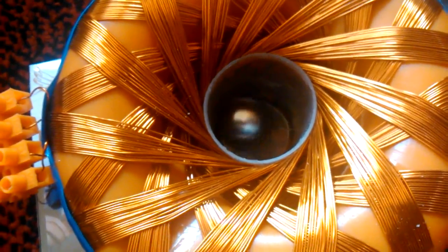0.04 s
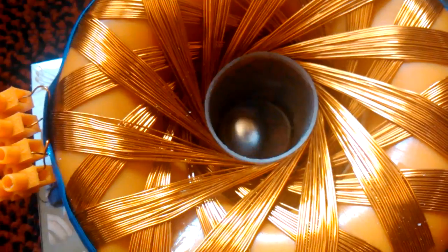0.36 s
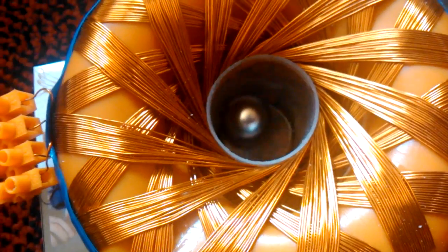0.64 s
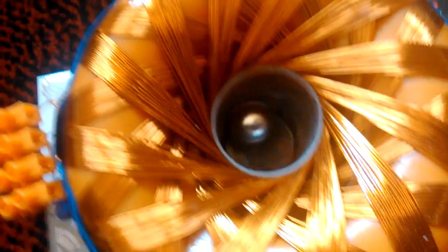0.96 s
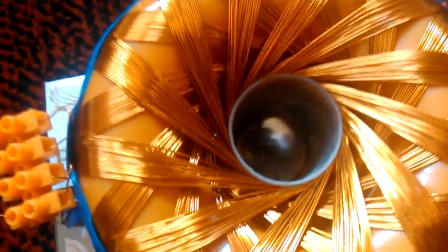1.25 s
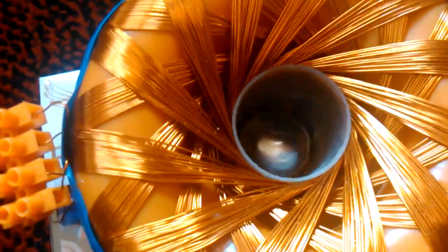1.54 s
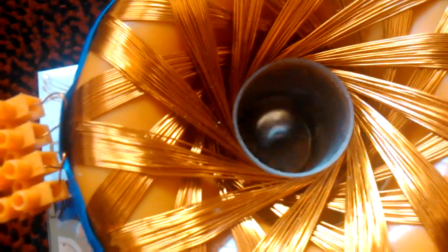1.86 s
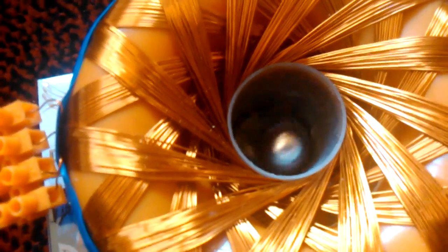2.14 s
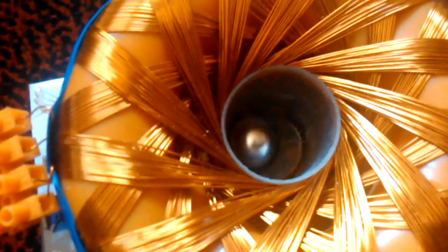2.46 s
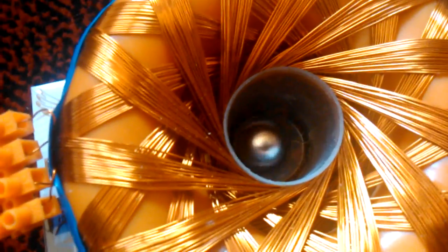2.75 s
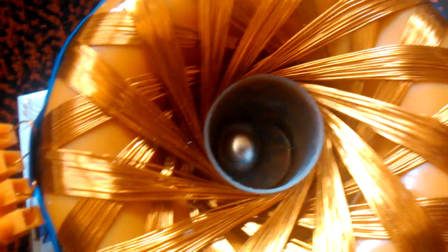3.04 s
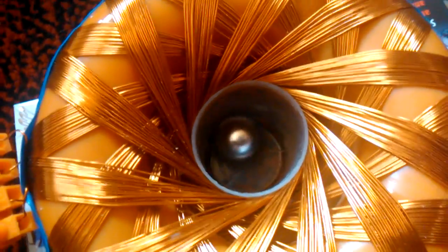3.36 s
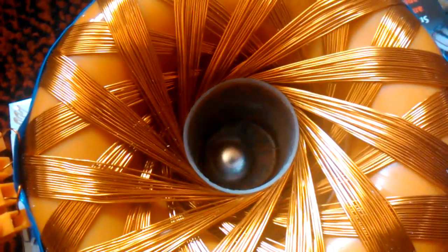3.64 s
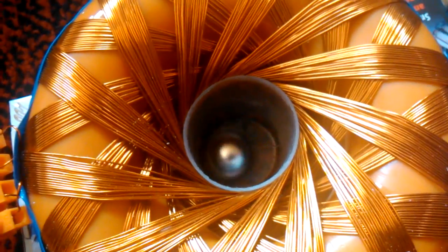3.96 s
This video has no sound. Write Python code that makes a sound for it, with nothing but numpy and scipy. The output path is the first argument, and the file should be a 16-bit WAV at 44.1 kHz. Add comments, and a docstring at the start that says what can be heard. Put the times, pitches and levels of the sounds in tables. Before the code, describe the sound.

A steel ball knocks and skids inside a tube with sharp, ringing, uneven clicks. Midway it races around with a bright scrape, then goes back to knocking. A faint electrical whine and rolling hiss lie underneath, heard up close.

```python
"""Sharp, ringing knocks and skids of a steel ball, thrown about in a tube by the field of its coils.
Each contact is a burst of tiny impacts that echoes between the tube's ends and jolts the mount.
For a second in the middle the ball races round with a bright, uneven scrape. Underneath, the
rolling ball hisses and the coils whine faintly; both dip briefly at loud contacts."""
import sys
import numpy as np
from scipy import signal
from scipy.fft import rfft, irfft
from scipy.io import wavfile
from scipy.ndimage import uniform_filter1d

SR = 44100
rng = np.random.default_rng(int(sys.argv[2]) if len(sys.argv) > 2 else 0)


def to_wav(s):
    """Save 16-bit WAV."""
    ch = np.atleast_2d(s).T  # columns
    pcm = np.round(np.clip(ch, -1, 1) * 32767)  # PCM
    wavfile.write(sys.argv[1], SR, pcm.astype(np.int16))


N = 176400
CONTACT_SAMPLES = 4096
TUBE_SPACING_HZ, SING_HZ = 603.5, 5445


def from_db(db):
    """Decibels to gain."""
    return 10 ** (np.asarray(db) / 20)


def unit_rms(x):
    """Scale to unit rms."""
    return x / np.sqrt(np.mean(x ** 2) + 1e-20)


def butter(x, hz, kind):
    """Second-order Butterworth filter."""
    return signal.sosfilt(signal.butter(2, hz, kind, fs=SR, output="sos"), x)


def colour(points, size):
    """Causal frequency response through (freq_hz, gain_db) points."""
    hz, db = np.transpose(points)
    f = np.maximum(np.arange(size // 2 + 1) * SR / size, 1)
    gain = from_db(np.interp(np.log(f), np.log(hz), db))
    cepstrum = irfft(np.log(gain))
    cepstrum[1:size // 2] *= 2
    cepstrum[size // 2 + 1:] = 0
    return np.exp(rfft(cepstrum))


def tube(echo, size, detune=0):
    """Response of sound running between the tube's ends; echo is the share left per round trip."""
    f = np.arange(size // 2 + 1) * SR / size
    return 1 / (1 - echo * np.exp(-2j * np.pi * f / (TUBE_SPACING_HZ * (1 + detune))))


# Wall spectrum: freq_hz, gain_db
WALL_SPECTRUM = [(100, 5), (600, -4.5), (850, -3), (1250, 0), (1800, 4), (2350, -0.5), (3000, -2.5),
                 (3800, -7.5), (5300, 2), (6000, -3.5), (7000, 9), (9400, 9.5), (10500, 12), (12500, 3.5),
                 (14000, 1)]
def wall(size):
    """Response of the tube wall to steel."""
    return colour(WALL_SPECTRUM, size)


def rumble():
    """Faint, steady low noise."""
    return from_db(-58.5) * unit_rms(butter(rng.standard_normal(N), (40, 110), "band"))


# Coil whine: harmonic, rms_db
COIL_HARMONICS = [(1, -59.5), (2, -42.5), (4, -49)]
def coils(pitch_hz=604):
    """The coils whine steadily on a few harmonics."""
    t = np.arange(N) / SR
    return sum(np.sqrt(2) * from_db(db) * np.sin(2 * np.pi * (harmonic * pitch_hz * t + rng.random()))
               for harmonic, db in COIL_HARMONICS)


# Hiss spectrum: freq_hz, gain_db
HISS_SPECTRUM = [(60, 15), (300, -3), (900, -18.5), (1400, 6), (1850, 6), (2700, 4), (3600, -6.5),
                 (5300, 2), (7300, 1), (9300, -0.5), (10400, 5), (12500, -5), (14000, 10.5)]
# Hiss envelope: time_s, level_db
HISS_LEVELS = [(0, -38.5), (.18, -33), (.58, -34), (.85, -30), (1.12, -34.5), (2.189, -33), (2.6, -35),
               (2.82, -31.5), (3.2, -35), (3.549, -35), (3.85, -37.5), (4, -24.5)]
def rolling(side_db=-29.5):
    """Fine roughness of the wall hisses under the ball and echoes in the tube."""
    roughness = rfft(rng.standard_normal((2, N)))
    mid, side = unit_rms(irfft(roughness * colour(HISS_SPECTRUM, N) * tube(echo=0.85, size=N)))
    hiss = mid + from_db(side_db) * np.array([side, -side])
    return hiss * from_db(np.interp(np.arange(N) / SR, *np.transpose(HISS_LEVELS)))


def glance(levels_db, full_db=11):
    """How glancing a contact is, 0-1: its ring stands out over its body."""
    body_db, ring_db = levels_db[1:3]
    return np.clip((ring_db - body_db) / full_db, 0, 1) ** 2


def rolling_on(decay_s=0.13, sing_width_hz=33):
    """After a glancing contact the ball rubs the wall until the next knock; one resonance sings."""
    t, pressure = np.arange(N) / SR, np.zeros(N)
    for start_s, _, *levels_db in list(KNOCK_CONTACTS) + list(SKID_CONTACTS):
        end_s = min([row[0] for row in KNOCK_CONTACTS if row[0] > start_s], default=np.inf)
        fade = (t > start_s) * (t < end_s) * np.exp(-np.abs(t - start_s) / decay_s)
        pressure = np.maximum(pressure, glance(levels_db) * fade)
    rub = irfft(rfft(rng.standard_normal(N)) * wall(N) * tube(echo=0.84, size=N))
    rub = unit_rms(butter(rub, (2040, 12100), "band"))
    resonance = signal.iirpeak(SING_HZ, SING_HZ / sing_width_hz, fs=SR)
    sing = unit_rms(signal.lfilter(*resonance, rng.standard_normal(N)))
    return pressure * (from_db(-37) * rub + from_db(-39) * sing)


def racing(start_s=1.17, end_s=2.23, lap_s=0.17, lap_peak_s=1.585):
    """The circling ball scrapes; an echo sweeps with its place and a very faint ring swells each lap."""
    t = np.arange(N) / SR
    lap = np.cos(2 * np.pi * (t - lap_peak_s) / lap_s)
    delay_s = 0.00076 * (1 - 0.114 * lap)
    scrape = irfft(rfft(rng.standard_normal(N)) * wall(N))
    scrape = sum(0.78 ** k * np.interp(t - k * delay_s, t, scrape) for k in range(4))
    scrape = unit_rms(butter(scrape, 4900, "high"))
    ring = unit_rms(butter(rng.standard_normal(N), (10700, 11000), "band"))
    flutter = unit_rms(uniform_filter1d(uniform_filter1d(rng.standard_normal(N), size=300), size=200))
    progress = np.clip((t - start_s) / (end_s - start_s), 0, 1)
    swell = np.abs(np.sin(np.pi * progress))
    return scrape * swell ** 0.25 * from_db(-38.5 + 5.5 * flutter) + ring * swell * from_db(-98 + 16 * lap)


# Contact bands (thud, body, ring, clack, tick): low_hz, high_hz
BANDS = [(56, 200.5), (150, 850), (1710, 1910), (2250, 5760), (8200, 22000)]
RING = 2
def band_responses(ring_hz, sing_gain=0, sing_width_hz=150):
    """The wall's sound in five bands; the singing resonance can sound along with the ring."""
    f = np.arange(CONTACT_SAMPLES // 2 + 1) * SR / CONTACT_SAMPLES
    edges_hz = [ring_hz if k == RING else band for k, band in enumerate(BANDS)]
    filters = [signal.butter(2, hz, "band", fs=SR, output="sos") for hz in edges_hz]
    responses = np.array([signal.sosfreqz(sos, f, fs=SR)[1] for sos in filters])
    resonance = signal.iirpeak(SING_HZ, SING_HZ / sing_width_hz, fs=SR)
    responses[RING] += sing_gain * signal.freqz(*resonance, f, fs=SR)[1]
    return responses * wall(CONTACT_SAMPLES)


def glide(ring, sharp_share, settle_s=0.00302):
    """The ring starts sharp and settles; the singing resonance above it holds its pitch."""
    t = np.arange(CONTACT_SAMPLES) / SR
    split_hz = np.sqrt(BANDS[RING][1] * SING_HZ)
    warped_s = t + sharp_share * settle_s * (1 - np.exp(-t / settle_s))
    return butter(ring, split_hz, "high") + np.interp(warped_s, t, butter(ring, split_hz, "low"))


ATTACK_S, RELEASE_S, CRACK_AT_S = 0.0007, 0.0016, 0.001215
DAMP_AFTER_S, DAMP_S, RING_DAMP_S = 0.0036, 0.0095, 0.0041
def contacts(rows, responses, echo=0.47, sag_db=2.5, grain_db=3, crack=0):
    """Bursts of tiny uneven impacts echo in the tube, each band at its own level; the thud rings on."""
    size = CONTACT_SAMPLES
    out, t = np.zeros(N + size), np.arange(size) / SR
    for start_s, length_s, *levels_db in rows:
        length_s = max(length_s, 0.002)
        after_s = np.maximum(t - length_s, 0)
        sag = from_db(-sag_db * np.minimum(t / length_s, 1))
        envelope = np.minimum(t / ATTACK_S, 1) * sag * np.exp(-after_s / RELEASE_S)
        signs = rng.choice([-1, 1], size)
        impacts = unit_rms(signs * from_db(grain_db * np.minimum(rng.exponential(1, size), 5)))
        impacts[int(CRACK_AT_S * SR)] += crack
        detune = 0.004 * rng.standard_normal()  # resonances shift with the ball's place
        bands = irfft(rfft(impacts * envelope) * responses * tube(echo, size, detune))
        bands[RING] = glide(bands[RING], sharp_share=0.431 * glance(levels_db))
        bands[1:] *= np.exp(-np.maximum(after_s - DAMP_AFTER_S, 0) / DAMP_S)
        bands[RING] *= np.exp(-after_s / RING_DAMP_S)
        bands *= np.sqrt(length_s * SR / np.sum(bands ** 2, axis=1, keepdims=True))
        onset = int(start_s * SR)
        out[onset:onset + size] += from_db(levels_db) @ bands
    return out[:N]


# Grazes: start_s, length_s, tick_db
GRAZE_CONTACTS = [(0.22, 0.0029, -28.5), (1.922, .004, -21), (1.275, 0.0076, -25), (1.475, 0.034, -27.5),
                  (1.674, 0.036, -27.5), (1.846, 0.025, -24), (2.001, 0.0038, -24), (2.048, 0.021, -25.5)]
def grazes(low_offset_db=-20.5, clack_offset_db=-7.5):
    """The ball brushes the wall: light and bright, mostly tick."""
    offsets_db = np.array([low_offset_db] * 3 + [clack_offset_db, 0])
    rows = [(start_s, length_s, *(tick_db + offsets_db)) for start_s, length_s, tick_db in GRAZE_CONTACTS]
    return contacts(rows, band_responses(BANDS[RING]))


# Skids: start_s, length_s, thud_db, body_db, ring_db, clack_db, tick_db
SKID_CONTACTS = [(0.1225, 0.0044, -31, -32, -33.5, -28, -22), (0.352, 0.0097, -26.5, -25, -22, -20.5, -21),
                 (0.368, 0.0099, -43, -35, -40, -29, -25.5), (0.547, 0.0095, -34, -31, -28, -25, -23),
                 (0.675, 0.03, -33, -29, -22.5, -23.5, -24.5),
                 (0.796, 0.0039, -22.5, -29.5, -28, -21.5, -19), (0.955, 0.029, -45, -35, -29, -27.5, -26),
                 (0.993, 0.0026, -19.5, -24.5, -27, -21.5, -19.5),
                 (1.172, 0.0094, -35, -32, -24, -23.5, -25.5), (1.188, 0.0091, -52, -48, -47, -26.5, -25),
                 (1.2, 0.0088, -26, -30.5, -41, -27, -27), (1.216, 0.0065, -30.5, -30.5, -39, -25.5, -22),
                 (1.289, 0.013, -60, -29.5, -53, -27.5, -23), (1.313, 0.012, -30, -21.5, -24, -19, -17),
                 (1.33, 0.01, -30, -26, -18, -20.5, -20), (1.391, 0.0088, -25, -29, -29, -23.5, -23),
                 (1.401, 0.026, -29, -22, -27, -21, -17), (1.43, 0.0027, -30, -36, -33, -23, -19),
                 (1.503, 0.02, -28.5, -24, -22.5, -20, -18.5), (1.576, 0.023, -27, -21.5, -26.5, -20, -16),
                 (1.599, 0.026, -33, -25, -43, -21.5, -19.5), (1.699, 0.025, -30, -23, -23, -20, -18),
                 (1.791, 0.013, -50, -21, -32, -20, -17), (1.811, 0.0083, -46, -36, -42, -28, -22),
                 (1.857, 0.0038, -28, -30, -20, -21.5, -41), (1.87, 0.024, -53, -29.5, -21, -24, -21),
                 (1.91, 0.006, -26.5, -29, -47, -24, -18),
                 (1.941, 0.028, -31.5, -26.5, -17.5, -22.5, -21.5),
                 (2.09, 0.018, -36, -29.5, -21.5, -21, -22.5), (2.12, 0.016, -27, -33, -48, -27, -25),
                 (2.139, 0.0045, -26, -19.5, -31, -22, -19.5), (2.151, 0.012, -34, -27, -38, -25, -22.5),
                 (2.198, 0.0024, -21.5, -19.5, -22, -16, -15), (2.539, 0.0047, -25, -22, -38, -23.5, -21.5),
                 (2.697, 0.0059, -35, -32.5, -50, -29.5, -23.5),
                 (2.777, 0.01, -42.5, -32.5, -29.5, -25, -24.5),
                 (2.923, 0.028, -32, -27, -24.5, -21.5, -23), (3.089, 0.0092, -26, -31.5, -41, -25, -21),
                 (3.105, 0.0045, -16.5, -16, -27, -16.5, -22.5),
                 (3.488, 0.011, -50, -35.5, -22.5, -23.5, -27), (3.587, 0.0091, -35, -30.5, -48, -28, -24),
                 (3.704, 0.0095, -41, -38, -18.5, -20.5, -16), (3.739, 0.0087, -32, -34, -22, -18, -16.5),
                 (3.759, 0.031, -54, -44, -24.5, -27, -24)]
def skids():
    """The ball skids and chatters along the wall with a narrow ring."""
    return contacts(SKID_CONTACTS, band_responses(BANDS[RING]))


# Knocks: start_s, length_s, thud_db, body_db, ring_db, clack_db, tick_db
KNOCK_CONTACTS = [(0.0887, 0.0068, -28.5, -24.5, -14, -16.5, -18.5),
                  (0.2045, 0.0038, -29, -21.5, -18, -14, -12), (0.324, 0.0087, -43, -35.5, -17, -21, -21),
                  (0.461, 0.0025, -28.5, -36, -31, -26.5, -11.5),
                  (0.516, 0.005, -26, -20, -22.5, -16, -14.5),
                  (0.595, 0.0048, -29.5, -22.5, -22.5, -19.5, -17),
                  (0.6447, 0.004, -42, -33, -32, -26.5, -13), (0.76, 0.013, -35, -30, -21.5, -22, -20.5),
                  (0.853, 0.0076, -27, -25.5, -23, -21, -16), (0.941, 0.0083, -31, -25.5, -19.5, -24, -18),
                  (1.088, 0.007, -36, -36.5, -47, -31.5, -15), (1.136, 0.026, -44, -35.5, -22, -26.5, -25),
                  (1.379, 0.006, -29, -25, -27, -23, -15.5), (1.567, 0.0028, -19, -25, -41, -21.5, -12.5),
                  (1.762, 0.0029, -19, -19.5, -28, -18.5, -13),
                  (1.778, 0.006, -23.5, -21.5, -29, -18.5, -16.5),
                  (1.981, 0.0027, -23.5, -20.5, -32, -20, -19), (2.07, 0.014, -32, -23, -23, -20.5, -18),
                  (2.264, 0.0033, -24, -15.5, -13.5, -14, -13.5),
                  (2.3382, 0.002, -24, -16.5, -19, -14.5, -12),
                  (2.384, 0.0044, -30, -18.5, -15.5, -15, -16.5),
                  (2.402, 0.0046, -25.5, -25, -41, -23, -23), (2.5131, 0.0056, -23.5, -20.5, -17, -17, -15),
                  (2.626, 0.0051, -27, -23, -24, -20, -15), (2.661, 0.0059, -32, -20.5, -17.5, -17, -18),
                  (2.761, 0.0087, -23, -21.5, -15, -17.5, -17.5),
                  (2.898, 0.0098, -36, -25.5, -22, -23, -19), (2.98, 0.0018, -27, -18.5, -29, -17.5, -16),
                  (3.051, 0.0048, -21, -16.5, -13.5, -13, -13), (3.227, 0.0056, -26, -22, -17, -19, -14.5),
                  (3.3186, 0.003, -25, -18, -14, -13.5, -11),
                  (3.3684, 0.0034, -25, -21.5, -22, -18.5, -13.5),
                  (3.457, 0.0097, -30, -26.5, -15.5, -18, -18),
                  (3.559, 0.0066, -24, -26.5, -23, -20.5, -12.5),
                  (3.575, 0.0098, -55, -38, -23.5, -20.5, -45), (3.667, 0.0058, -35, -30.5, -26, -21, -15),
                  (3.797, 0.0054, -20.5, -22.5, -40, -21.5, -17),
                  (3.827, 0.003, -29, -28.5, -27, -25.5, -19),
                  (3.8916, 0.0073, -33.5, -25, -15, -16.5, -17), (3.969, 0.0094, -36, -29, -23, -20.5, -18)]
def knocks():
    """The ball hits hard: an early crack, a broader ring and the singing resonance."""
    responses = band_responses(ring_hz=(1653, 2130), sing_gain=from_db(-3.5))
    return contacts(KNOCK_CONTACTS, responses, echo=0.56, sag_db=2, grain_db=2.5, crack=from_db(8.5))


def held_excess_db(x, threshold_db=-41, recovery_db_per_s=343):
    """Level over the threshold; each peak is let go at a steady rate."""
    level_db = 10 * np.log10(np.maximum(uniform_filter1d(x ** 2, size=256), 1e-12))
    excess_db = np.maximum(level_db - threshold_db, 0)
    recovery_db = recovery_db_per_s * np.arange(N) / SR
    held_db = np.maximum.accumulate(excess_db + recovery_db) - recovery_db
    return uniform_filter1d(held_db, size=256)


def scene():
    """The ball in the centre, whine and hiss dipping under its contacts, over a faint noise floor."""
    hits = knocks() + skids() + grazes()
    excess_db = held_excess_db(hits)
    low_floor = rumble()
    whine = from_db(-0.89 * excess_db) * coils()
    hiss = from_db(-0.27 * excess_db) * (rolling() + rolling_on())
    scrape = racing()
    mic_noise = from_db(-56) * rng.standard_normal((2, N))
    return mic_noise + low_floor + whine + hiss + scrape + hits


def record(dry, low_cut_hz=45.5, top_cut_hz=14000):
    """A steep low cut that rings after each thud, rounded peaks and a steep top cut."""
    x = signal.sosfilt(signal.cheby1(6, 0.59, low_cut_hz, "high", fs=SR, output="sos"), dry)
    x = 0.91 * np.tanh(x / 0.86)
    return signal.sosfilt(signal.ellip(10, 0.3, 70, top_cut_hz, fs=SR, output="sos"), x)


dry = scene()
out = record(dry)
to_wav(out)
```